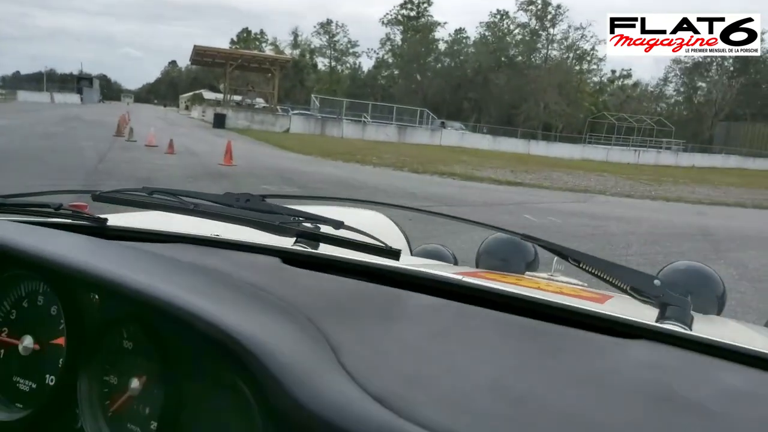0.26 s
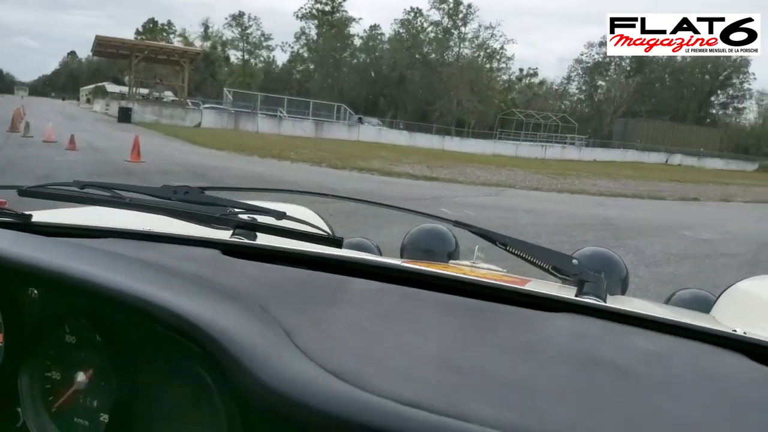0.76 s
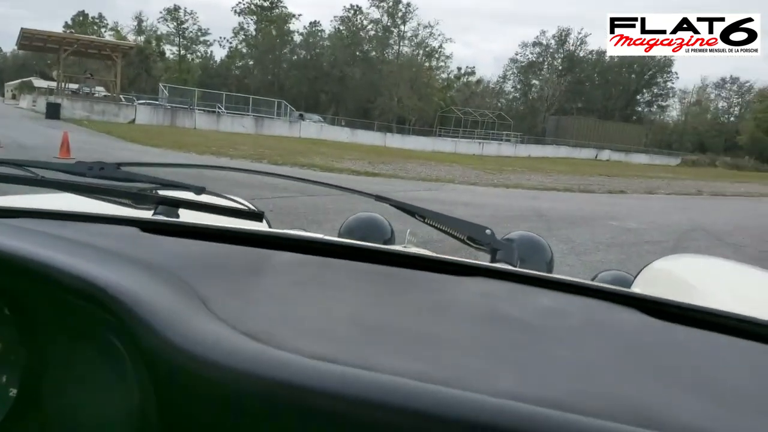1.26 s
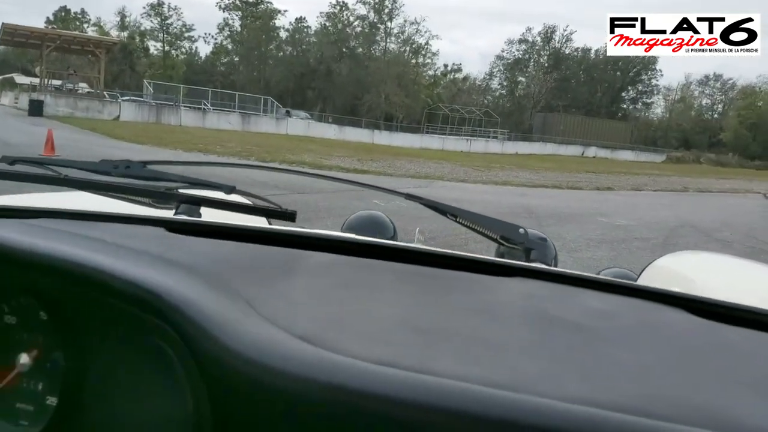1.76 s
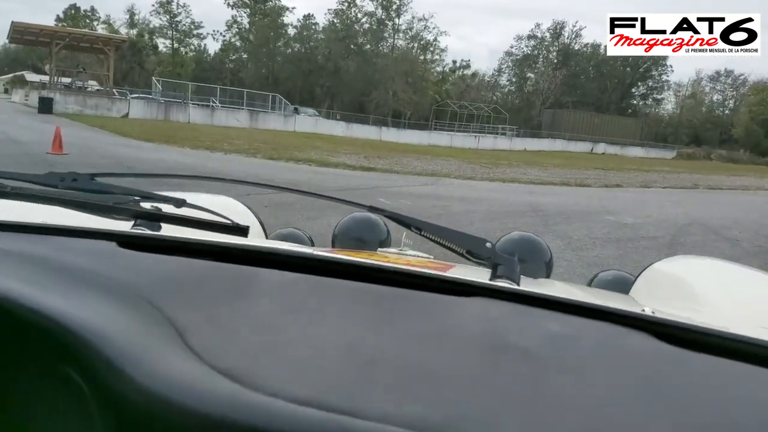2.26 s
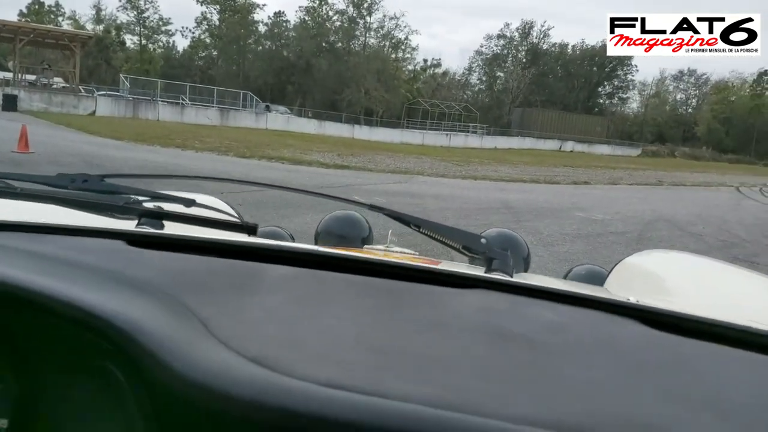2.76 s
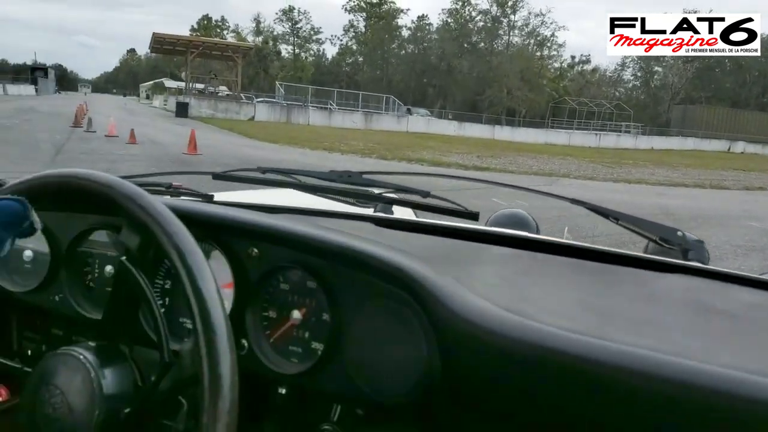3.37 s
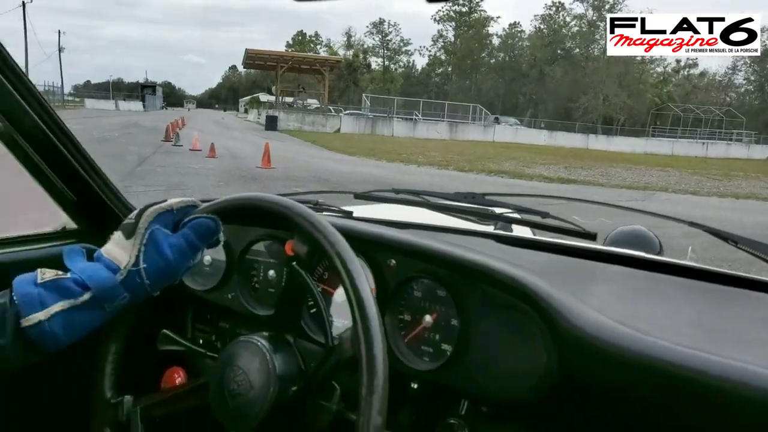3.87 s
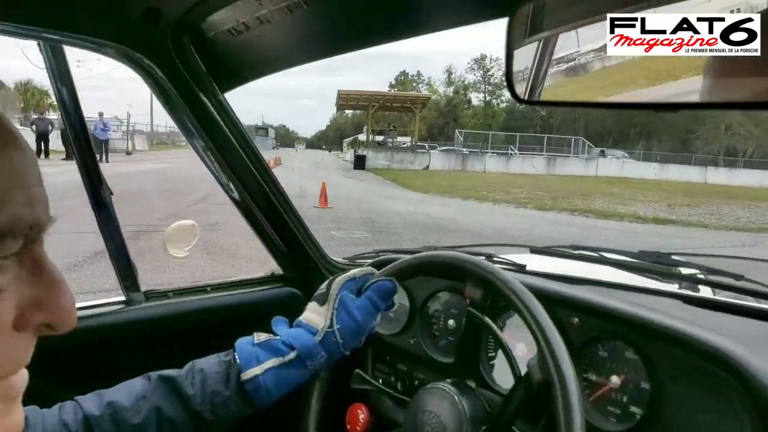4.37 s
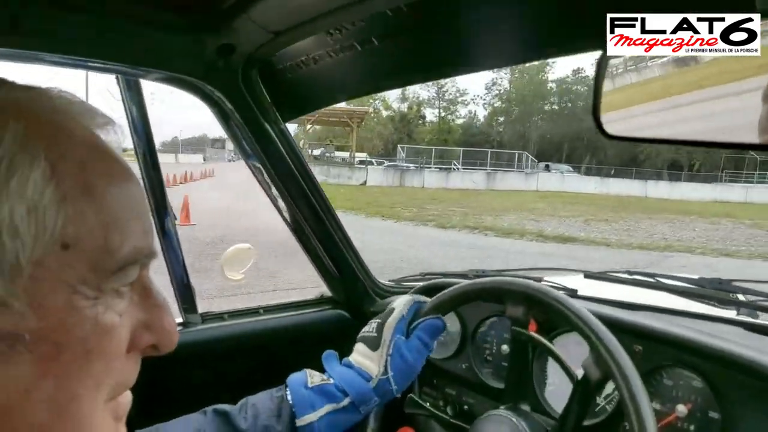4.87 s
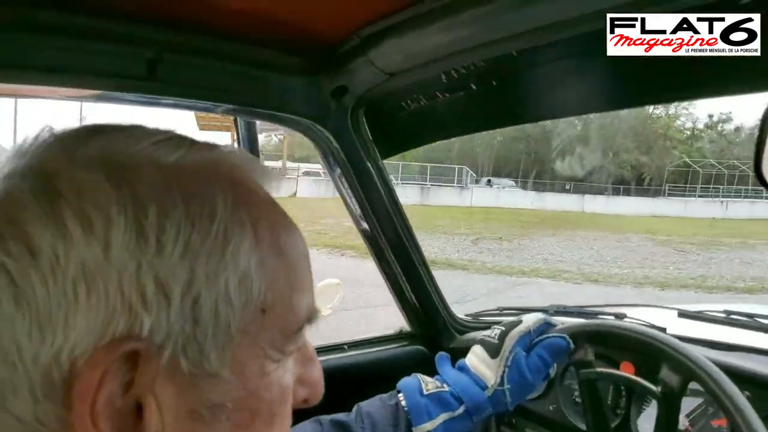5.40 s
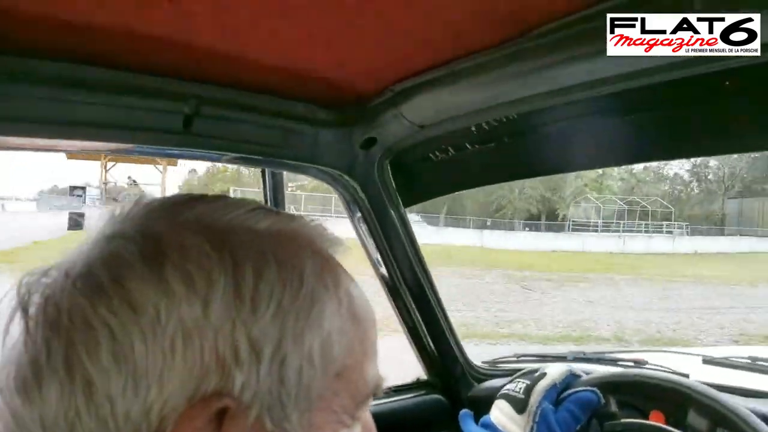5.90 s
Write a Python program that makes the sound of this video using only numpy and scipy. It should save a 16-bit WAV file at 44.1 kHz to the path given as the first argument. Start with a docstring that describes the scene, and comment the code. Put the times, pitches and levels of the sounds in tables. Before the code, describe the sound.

A flat-six burbles unevenly, is blipped and revved; a sharp door-like clack dulls the treble, revs drop, and a deep boomy drone climbs.

```python
"""Air-cooled six-cylinder engine heard in the cabin

A lumpy idle, throttle blips and a pull away: two cylinder banks fire in turn, as wavering harmonics
and random booms through cabin resonances, with filtered growl and rasp and valve gear and fan hiss.
A latch rattles at first as decaying noise; a hard clack shuts the cabin and the treble turns duller.
Soft thuds of the body shell are decaying sines."""
import sys
import numpy as np
from scipy import signal
from scipy.io import wavfile

SR = 44100
rng = np.random.default_rng(int(sys.argv[2]) if len(sys.argv) > 2 else 0)


def unload_audio(sound):
    """Save the sound as a 16-bit wav file, at the path given as the first command line argument."""
    columns = np.transpose(np.atleast_2d(sound))
    # keep every value between -1 and 1, then stretch to whole-number steps
    steps = np.round(np.clip(columns, -1, 1) * 32767)
    wavfile.write(sys.argv[1], SR, steps.astype(np.int16))


N = 270768
TIME = np.arange(N) / SR

# Speed of the engine: time_s, bank_rate_hz (firings per second of one bank)
BANK_RATE = [(0, 34.4), (.4, 33.1), (.8, 31.1), (1.3, 31.2), (1.37, 32.4), (1.51, 44.4), (1.65, 53.4),
             (1.79, 45.9), (1.86, 44), (2.03, 41.1), (2.24, 42.6), (2.5, 45.8), (2.57, 50.3), (2.64, 58),
             (2.78, 69), (2.92, 77.4), (2.99, 73.4), (3.06, 71.5), (3.15, 69.8), (3.3, 68.9), (3.4, 69.9),
             (3.46, 66.3), (3.53, 64.8), (3.66, 66.1), (3.72, 61.1), (3.79, 47.9), (3.85, 41.3),
             (3.92, 38.8), (4.05, 49), (4.11, 52.3), (4.2, 54.9), (4.31, 53.8), (4.44, 48.9), (4.5, 47.9),
             (4.65, 50.2), (4.9, 49.2), (5.17, 48.9), (5.3, 51), (5.56, 52.1), (5.95, 58.8), (6.14, 61.2)]
# Firing tone of both banks before surges: time_s, rms_db
FIRING_TONE = [(0, -12.5), (.2, -18), (.5, -20), (.9, -17), (1.3, -16.5), (1.5, -13), (1.6, -10.5),
               (1.8, -22), (2.04, -18), (2.12, -10.5), (2.62, -7.5), (2.69, -24), (2.76, -27),
               (2.82, -18.5), (3.03, -19), (3.15, -17.5), (3.45, -17), (3.6, -12.5), (3.7, -17.5),
               (3.75, -22), (3.82, -11.5), (3.9, -14), (4.05, -7), (4.2, -10), (4.41, -7), (4.55, -9),
               (5.2, -9), (5.58, -11), (5.71, -15.5), (5.95, -13), (6.14, -14)]
# Other harmonics of the bank rate, base levels: multiple, open_rms_db, shut_rms_db
HARMONICS = [(1.0, -34.5, -37.5), (3.0, -27, -26.5), (4.0, -33.1, -32.6), (5.0, -30.5, -33.5),
             (6.0, -35.5, -33.5), (7.0, -37.5, -36)]
# Common rise of those harmonics: time_s, gain_db
HARMONIC_RISE = [(0.0, -2.5), (0.3, -2.5), (0.7, -1.5), (1.3, -4), (1.5, 7.5), (1.65, -5), (1.8, -4.5),
                 (2.1, 1), (2.5, 4.5), (2.64, -1), (2.75, 1), (2.92, -6.5), (3.05, -1.9), (3.4, 1.4),
                 (3.66, 2), (3.78, -10), (4.03, 3.5), (4.2, -4), (4.45, 1.6), (5.2, 2), (5.5, 2.5),
                 (5.8, 2), (6.14, 7)]
# Response of pipes and cabin, banks opposed or adding: frequency_hz, odd_gain_db, even_gain_db
TONE_RESPONSE = [(30.0, -11, 0.0), (51, -11, -0.0), (69, 8.5, -0.0), (94, -0.5, -0.5), (140, 4, 15),
                 (154, -2.6, 8.1), (173, -0.3, 2.8), (192, 0.1, -10), (215.2, 7, -1.5), (224.7, 16.5, -2),
                 (247.5, 7, -5.5), (250, -9.5, 3.5), (291, 2.5, 5.5), (348, -8, -3.5), (373, -1.5, -2),
                 (410, -4, -15), (472, 4.5, -10), (542, -4, -0.0)]
# Sudden strong firings that swell the tones: start_s, rise_db
STRONG_FIRINGS = [(0.569, 10), (.74, 8), (.89, 3), (1.109, 3.5), (1.2, 2.5), (1.36, 9), (1.84, 12.5)]
SURGE_RISE_S, SURGE_HOLD_S, SURGE_SAG_S = 0.012, 0.031, 0.062  # hold is counted from the start
SURGE_HARMONIC_SHARE, SURGE_GROWL_SHARE = 0.28, 0.25  # dB per dB of surge

# Boom between the tones: time_s, level_db
BURN_LEVEL = [(0, -15.5), (.12, -16), (.4, -19.5), (1.2, -21.5), (1.4, -19), (2.1, -20), (2.42, -20),
              (2.53, -29), (2.64, -17.5), (2.75, -28), (2.9, -17.5), (3.08, -19), (3.2, -23), (3.65, -24.5),
              (3.8, -19.5), (4.1, -18), (4.4, -19), (4.95, -22), (5.4, -21), (5.7, -16.5), (6.05, -19.5),
              (6.14, -20)]
# Resonances of the cabin air: frequency_hz, width_hz, open_gain_db, shut_gain_db
CABIN_MODES = [(62.6, 22, 0, -22), (90.6, 41, 3.5, -2), (136.2, 46.4, -6, -5), (225.6, 55.6, -3, -6.5),
               (294.1, 19.5, -15, -11.5)]

# Exhaust growl before surges: time_s, level_db
GROWL_LEVEL = [(0, -37), (.3, -35.5), (.58, -42.5), (.78, -36.5), (1.0, -40), (1.28, -41.5), (1.38, -27.5),
               (1.74, -36), (2.05, -35), (2.5, -30.5), (2.66, -24), (2.84, -23.5), (2.96, -36.5),
               (3.15, -22), (3.55, -24), (3.8, -32), (4.07, -34), (4.28, -31), (4.52, -38), (4.72, -29),
               (5.5, -28.5), (5.75, -24), (6.14, -20)]
# Exhaust pipes heard through the floor: frequency_hz, relative_density_db (per Hz)
GROWL_SPECTRUM = [(200, -38.5), (330, -8.5), (371, -11), (410, -8.5), (445, -9.5), (482, -3), (497, -2.5),
                  (514, -0.5), (530, -5.5), (556, -8), (600, -13.5), (790, -46), (1340, -100)]
# Intake rasp: time_s, level_db
RASP_LEVEL = [(0, -34), (.11, -28), (.24, -39.5), (.6, -41.5), (1.22, -42.5), (1.43, -34), (1.7, -41.5),
              (2.0, -39), (2.35, -37), (2.64, -37.5), (2.97, -36.5), (3.19, -32), (3.5, -33.5),
              (3.63, -29.5), (3.76, -40), (4.05, -33), (4.22, -27.5), (4.45, -33), (5.1, -33), (5.6, -30),
              (6.05, -22), (6.14, -22)]
# Intake and engine lid: frequency_hz, relative_density_db (per Hz)
RASP_SPECTRUM = [(360, -31.5), (610, -2.5), (636, 4), (742, -3), (794, -3), (876, -2.5), (1040, -11),
                 (1150, -10), (1500, -13), (1950, -44), (3300, -120)]

# Valve gear and fan hiss, open cabin: frequency_hz, relative_density_db (per Hz)
OPEN_HISS_SPECTRUM = [(590, -30), (1000, -3.5), (1100, -1), (1360, 0.5), (2080, -4), (2390, -8), (3660, -9),
                      (4010, -19.5), (4350, -12.5), (6060, -23.5), (7200, -35), (8650, -41), (9820, -30.5),
                      (12600, -32.5), (15500, -46)]
# The same in the shut cabin: frequency_hz, relative_density_db (per Hz)
SHUT_HISS_SPECTRUM = [(590, -22.5), (1000, -4), (1120, -11), (1840, -10.5), (2230, -15.5), (3530, -25.5),
                      (4010, -36), (4450, -30), (6060, -32), (7290, -37.5), (8080, -50.5), (8750, -39),
                      (15500, -52)]
HISS_OPEN_DB, HISS_SHUT_DB = -34.5, -39.5  # at the usual rasp level
USUAL_RASP_DB, HISS_SHARE = -35, 0.57  # hiss rises by this many dB per dB of rasp

# Closing of the cabin: start_s, end_s
CLOSING_S = (2.7, 2.9)
SHUT = np.interp(TIME, CLOSING_S, (0, 1))  # 0 open, 1 shut

# Latch knocks: start_s, chatter_rms_db, length_s, t60_s, panel_drive_db (relative to the chatter)
LATCH_KNOCKS = [(.001, -24, .02, .15, 0), (.0835, -18, .008, .1, 0), (.1, -21, .012, .15, 3),
                (.135, -27, .01, .1, 6), (.159, -23, .015, .15, -3), (.26, -30, .004, .08, -3),
                (2.758, -36, .003, .05, -9), (2.797, -34, .004, .06, -9), (3.083, -40, .003, .05, -9),
                (2.6685, -7, .003, .015, 3), (2.6735, -13, .003, .015, 3), (2.679, -14, .006, .015, -6),
                (2.6888, -6, .0016, .005, -9), (2.6942, -11, .003, .006, -8), (2.6995, -15, .002, .008, -6),
                (2.702, -34, .01, .15, 0)]
# Metal chatter of the latch: frequency_hz, relative_density_db (per Hz)
LATCH_SPECTRUM = [(600, -28), (1100, -5), (1700, 1), (2400, -3), (3150, -1), (3950, -10), (4900, -10),
                  (8000, -43), (11300, -25), (15500, -40)]
# Modes of the panel behind the latch: frequency_hz, width_hz, gain_db
PANEL_MODES = [(260, 22, 22), (317, 180, 24.5), (540, 57, 20), (749, 51, 14), (1042, 133, 13.5)]
# Body shell blows: start_s, level_db (of the decay, before the soft onset), frequency_hz, t60_s
SHELL_THUDS = [(2.915, -11, 92, .3), (2.67, -12, 62, .09), (3.04, -18, 100, .15), (5.9, -19, 55, .6)]

BAND_EDGE_HZ = 15700


def amp(db):
    """Decibel law: 20 dB is a tenfold amplitude."""
    return 10 ** (np.asarray(db) / 20)


def evened(x):
    """Normalisation of mean power: scales to rms 1."""
    return x / np.sqrt(np.mean(x ** 2) + 1e-20)


def curves(rows):
    """Linear interpolation: every column after the first, sample by sample."""
    time_s, *columns = np.transpose(rows)
    return [np.interp(TIME, time_s, column) for column in columns]


def open_to_shut(open_db, shut_db):
    """Cross-fade in dB as the cabin closes."""
    return open_db + SHUT * (shut_db - open_db)


def colour(x, spectrum):
    """Minimum-phase filtering: the log spectrum fixes the phase of a causal response."""
    hz, db = np.transpose(spectrum)
    grid_hz = abs(np.fft.fftfreq(8192, 1 / SR)) + 1  # the offset avoids log of zero
    grid_db = np.interp(np.log(grid_hz), np.log(hz), db)
    log_gain = np.log(amp(np.maximum(grid_db, -100)))
    response = np.exp(signal.hilbert(log_gain).conj())
    taps = np.fft.ifft(response).real[:4096]
    return signal.oaconvolve(x, taps)[:len(x)]


def resonance(x, hz, width):
    """Resonance: a band-pass applied twice, for steep skirts."""
    b, a = signal.iirpeak(hz, hz / width, SR)
    once = signal.lfilter(b, a, x)
    return signal.lfilter(b, a, once)


def wander(hz):
    """Low-passed noise: random fluctuation of rms 1, up to about hz."""
    lowpass = signal.butter(2, hz, fs=SR, output="sos")
    return evened(signal.sosfilt(lowpass, rng.standard_normal(N)))


def tones(bank_cycles, levels_db, waver_db=-1.0):
    """Harmonic series of the bank rate: each partial wavers by itself, delayed differently by the pipes."""
    out = np.zeros(N)
    for k, db in enumerate(levels_db, 1):
        gain = np.sqrt(2) * amp(db + waver_db * wander(7.5))  # rms to peak
        out += gain * np.cos(2 * np.pi * k * bank_cycles + 0.8026 * k ** 2)
    return out


def tone_levels(rate):
    """Resonant transmission: the firing tone is as driven, other harmonics swell as they cross resonances."""
    hz, odd_db, even_db = np.transpose(TONE_RESPONSE)
    surge_db = surges()
    common_db = curves(HARMONIC_RISE)[0] + SURGE_HARMONIC_SHARE * surge_db
    levels = []
    for k, open_db, shut_db in HARMONICS:
        response_db = odd_db if round(k) % 2 else even_db
        passed_db = np.interp(np.log(k * rate), np.log(hz), response_db)
        levels.append(open_to_shut(open_db, shut_db) + common_db + passed_db)
    firing_db = curves(FIRING_TONE)[0] + surge_db
    return levels[:1] + [firing_db] + levels[1:]  # the firing tone is the second harmonic


def surges():
    """Transient excitation: extra dB of strong firings, with quick rise, hold and exponential sag."""
    out = np.zeros(N)
    for start_s, rise_db in STRONG_FIRINGS:
        t = TIME - start_s
        rise = np.clip(t / SURGE_RISE_S, 0, 1)
        sag = np.exp(-np.maximum(t - SURGE_HOLD_S, 0) / SURGE_SAG_S)
        out += rise_db * rise * sag
    return out


def uneven_burn(bank_cycles, rate, level_db):
    """Random excitation of room modes: unequal firings and noise boom in the cabin between the tones."""
    number = np.floor(2 * bank_cycles).astype(int)  # both banks fire once in each bank cycle
    clicks = (np.diff(number, prepend=0) > 0) / np.sqrt(rate)  # equal power at any speed
    strength = rng.uniform(-0.7, 1, number[-1] + 1)[number]
    kicks = 0.62 * evened(clicks * strength) + 0.87 * rng.standard_normal(N)
    boom = np.zeros(N)
    for hz, width, open_db, shut_db in CABIN_MODES:
        boom += amp(open_to_shut(open_db, shut_db)) * resonance(kicks, hz, width)
    return amp(level_db) * evened(boom)


def pipes(bank_cycles, rate, level_db, spectrum, clean, waver_db):
    """Pipe resonance: higher harmonics of scattered phase, in turbulence that puffs with each firing."""
    stack = np.zeros(N)
    for k in range(5, 30):
        waver = amp(waver_db * np.tanh(wander(14.0)))
        stack += waver * np.cos(2 * np.pi * (k * bank_cycles + rng.random()))
    since_firing = 2 * bank_cycles % 1  # fraction of the firing interval
    puffs = (1 + np.exp(-since_firing / 0.14)) * rng.standard_normal(N)
    source = clean * stack / np.sqrt(rate) + evened(puffs)
    return amp(level_db) * evened(colour(source, spectrum))


def hiss(bank_cycles, level_db, pulsing=0.092, flicker_db=1.06):
    """Amplitude-modulated noise: valve gear and fan throb with the firings, duller once the cabin is shut."""
    throb = 1 + pulsing * np.cos(4 * np.pi * bank_cycles)
    air = rng.standard_normal(N) * throb * amp(flicker_db * wander(13))
    open_air = evened(colour(air, OPEN_HISS_SPECTRUM))
    shut_air = evened(colour(air, SHUT_HISS_SPECTRUM))
    return amp(level_db) * (SHUT * shut_air + (1 - SHUT) * open_air)


def latch():
    """Impact noise: a chatter of metal contacts holds briefly, dies, and rings the modes of the panel behind."""
    metal_power, panel_power = np.zeros(N), np.zeros(N)
    for start_s, db, length_s, t60_s, drive_db in LATCH_KNOCKS:
        t = TIME - start_s
        decay_db = 60 * np.clip(t - length_s, 0, 1) / t60_s
        power = (t > 0) * amp(db - decay_db) ** 2
        metal_power += power
        panel_power += power * amp(drive_db) ** 2
    chatter = evened(rng.standard_normal(N) * amp(2.2 * wander(910)))
    panel_blow = chatter * np.sqrt(panel_power)
    ring = sum(amp(db) * resonance(panel_blow, hz, width) for hz, width, db in PANEL_MODES)
    steady_rms = np.std(colour(chatter, LATCH_SPECTRUM))
    return colour(chatter * np.sqrt(metal_power), LATCH_SPECTRUM) / steady_rms + ring


def thuds():
    """Damped oscillation: soft low blows through the body shell decay as sines."""
    out = np.zeros(N)
    for start_s, db, hz, t60_s in SHELL_THUDS:
        t = np.maximum(TIME - start_s, 0)
        onset = 1 - np.exp(-t * hz / 2.0)
        out += amp(db - 60 * t / t60_s) * onset * np.sin(2 * np.pi * hz * t)
    return out


def scene():
    """Superposition: engine layers share one firing phase; latch and body shell add to them."""
    rate, rasp_db, growl_db = curves(BANK_RATE)[0], curves(RASP_LEVEL)[0], curves(GROWL_LEVEL)[0]
    load_db = rasp_db - USUAL_RASP_DB
    hiss_db = open_to_shut(HISS_OPEN_DB, HISS_SHUT_DB) + HISS_SHARE * load_db
    burn_db = curves(BURN_LEVEL)[0]
    growl_db = growl_db + SURGE_GROWL_SHARE * surges()
    bank_cycles = np.cumsum(rate) / SR
    engine = tones(bank_cycles, tone_levels(rate))
    engine += uneven_burn(bank_cycles, rate, burn_db)
    engine += hiss(bank_cycles, hiss_db)
    engine += pipes(bank_cycles, rate, growl_db, GROWL_SPECTRUM, clean=0.65, waver_db=4.5)
    engine += pipes(bank_cycles, rate, rasp_db, RASP_SPECTRUM, clean=0.45, waver_db=3.0)
    return (engine + latch() + thuds())[None]


def record(dry):
    """Transducer limits: bass roll-off of a small microphone, soft overload and a band limit."""
    highpass = signal.butter(3, 42, "high", fs=SR, output="sos")
    sound = signal.sosfilt(highpass, dry)
    sound = sound / (1 + abs(sound) ** 6) ** (1 / 6)
    sound = np.pad(sound, ((0, 0), (255, 255)), "reflect", reflect_type="odd")  # room for the filter
    lowpass = signal.firwin(511, BAND_EDGE_HZ, window=("kaiser", 9), fs=SR)
    return signal.oaconvolve(sound, lowpass[None], "valid")


dry = scene()
out = record(dry)
unload_audio(out)
```